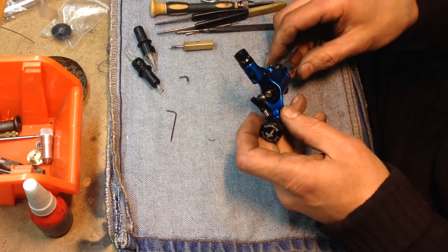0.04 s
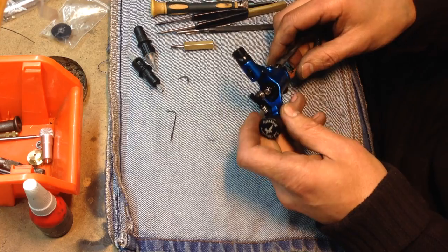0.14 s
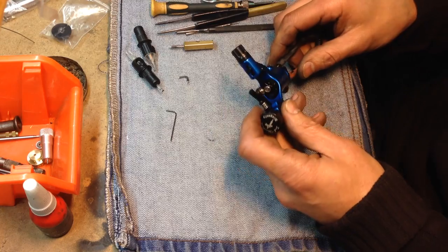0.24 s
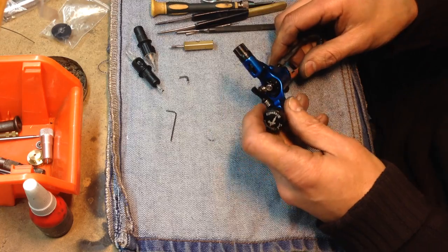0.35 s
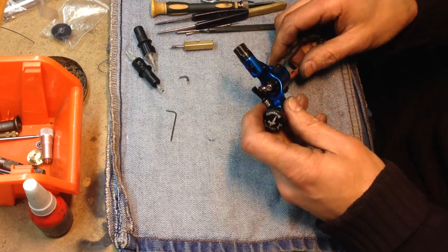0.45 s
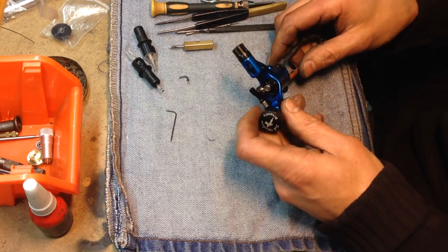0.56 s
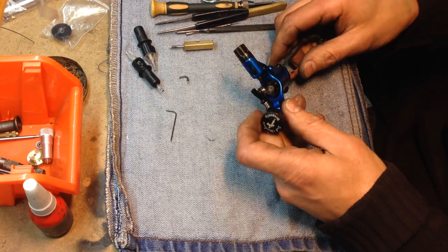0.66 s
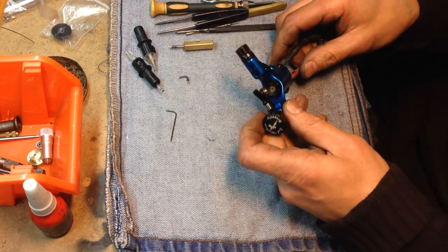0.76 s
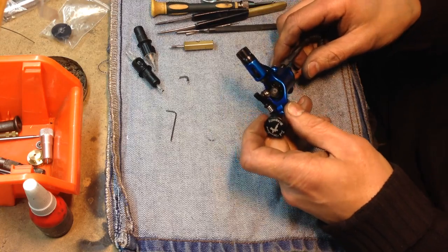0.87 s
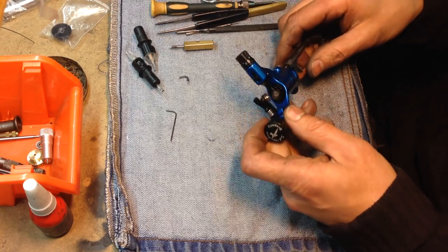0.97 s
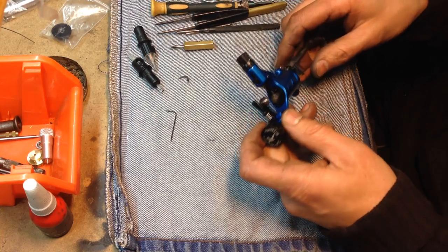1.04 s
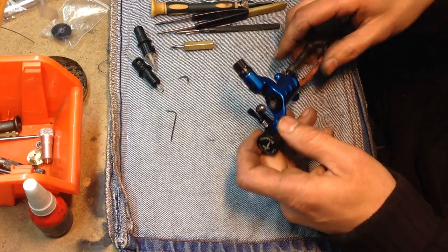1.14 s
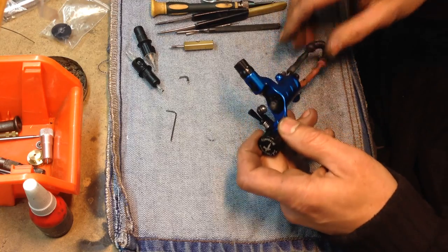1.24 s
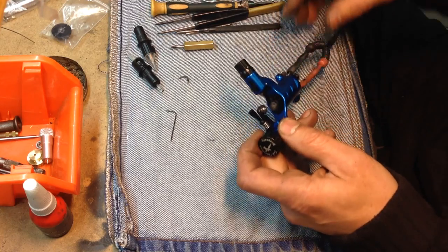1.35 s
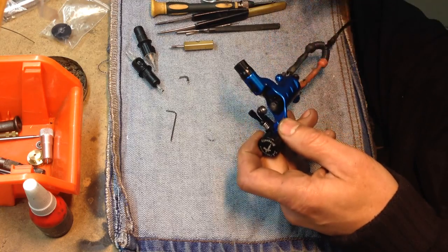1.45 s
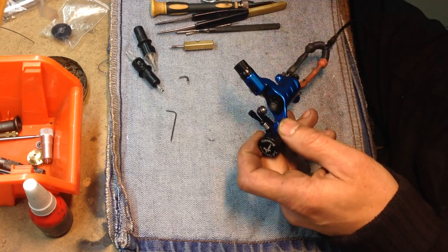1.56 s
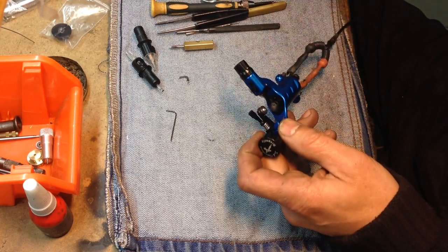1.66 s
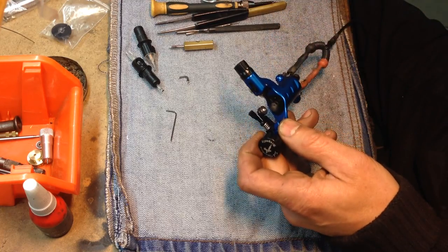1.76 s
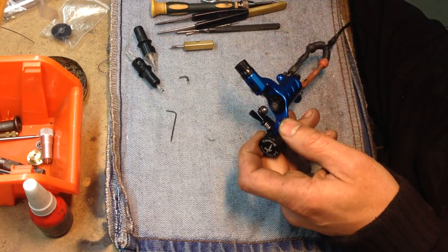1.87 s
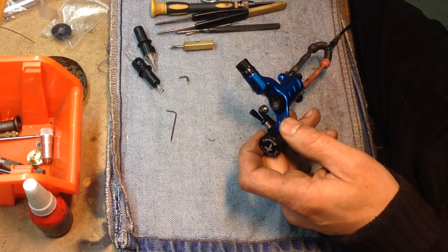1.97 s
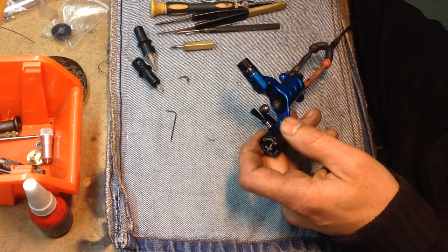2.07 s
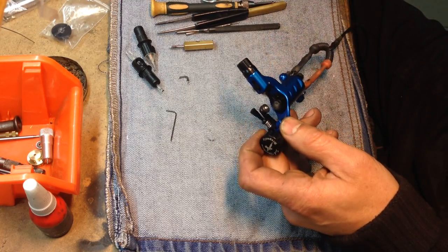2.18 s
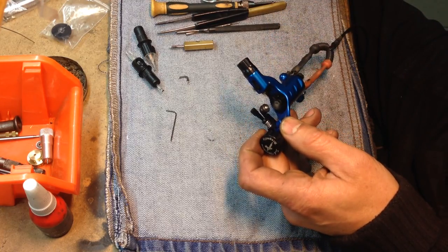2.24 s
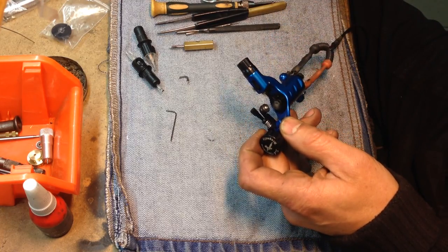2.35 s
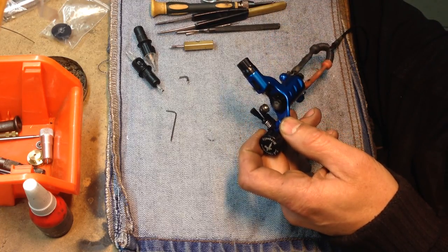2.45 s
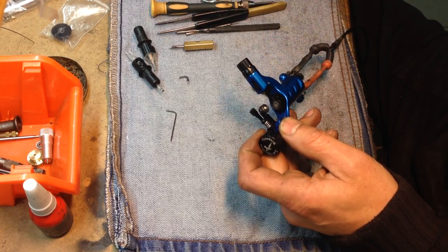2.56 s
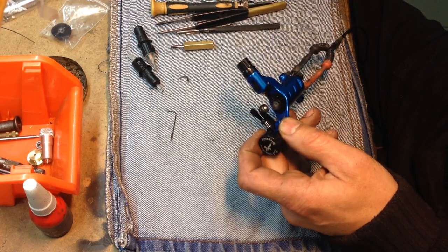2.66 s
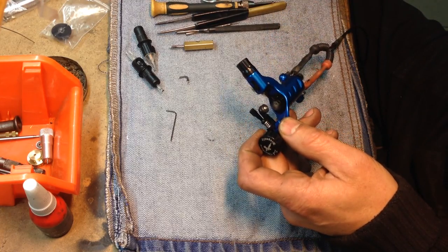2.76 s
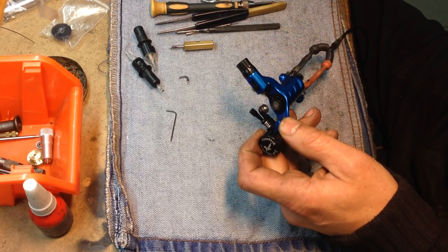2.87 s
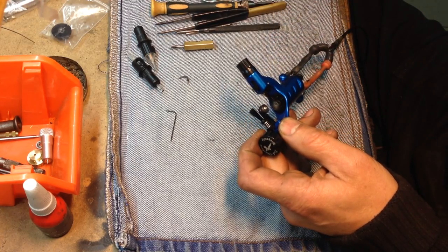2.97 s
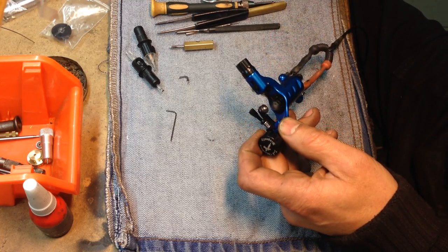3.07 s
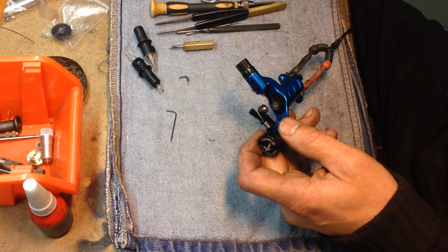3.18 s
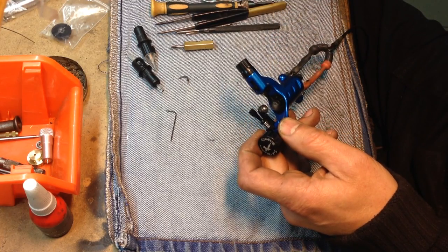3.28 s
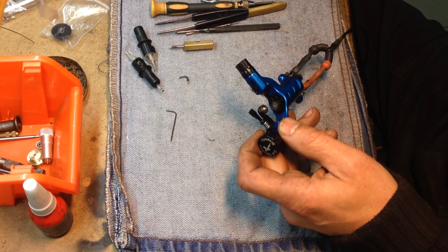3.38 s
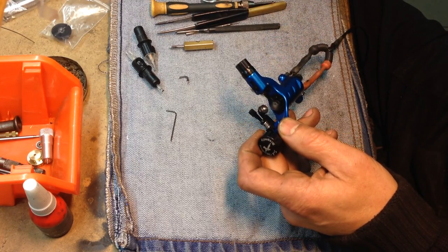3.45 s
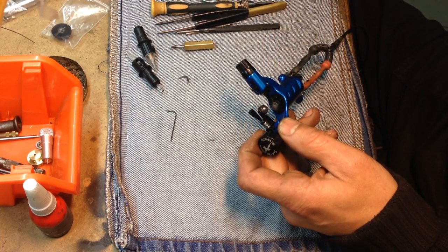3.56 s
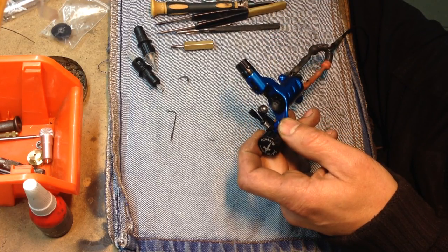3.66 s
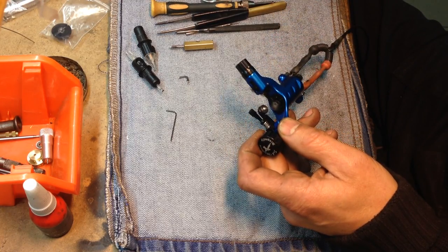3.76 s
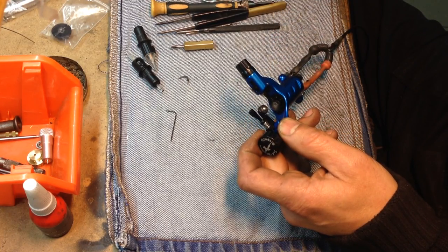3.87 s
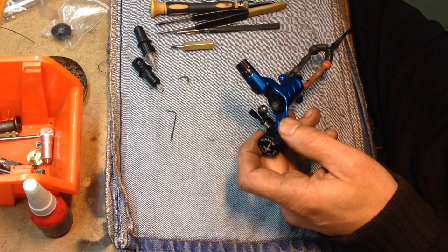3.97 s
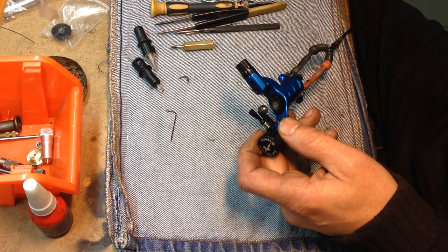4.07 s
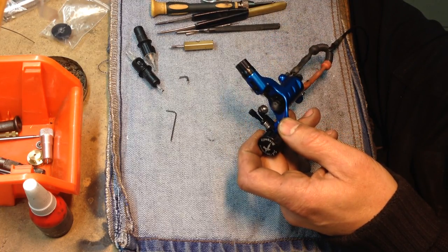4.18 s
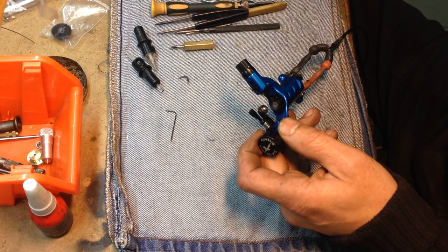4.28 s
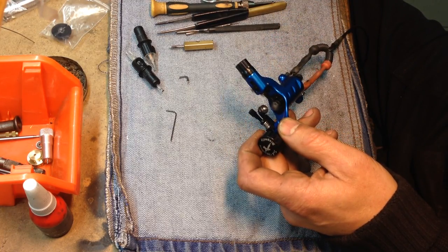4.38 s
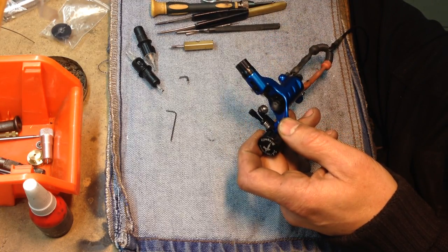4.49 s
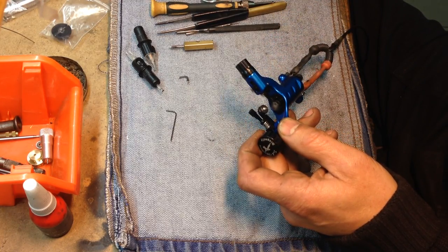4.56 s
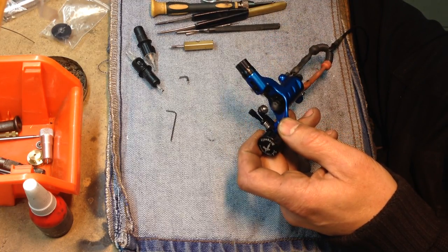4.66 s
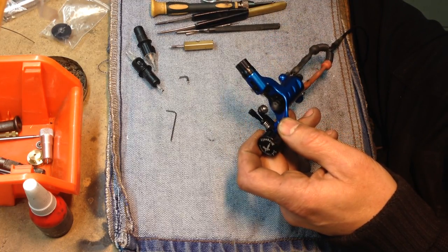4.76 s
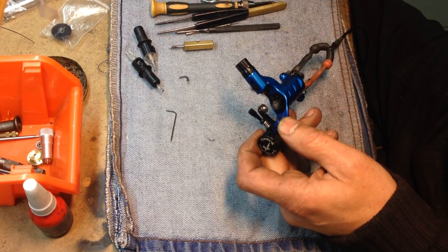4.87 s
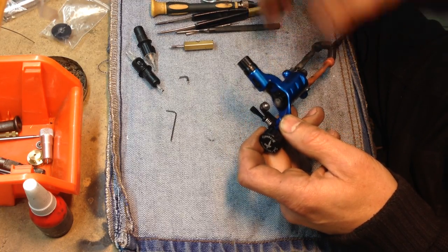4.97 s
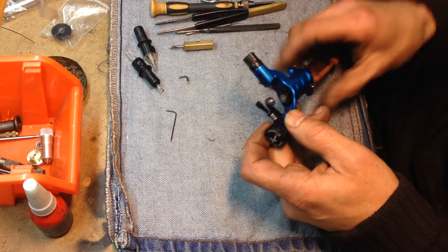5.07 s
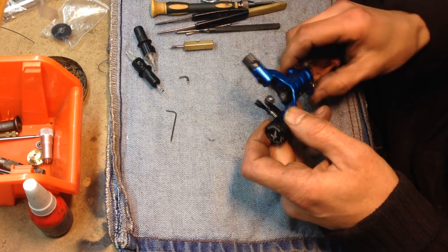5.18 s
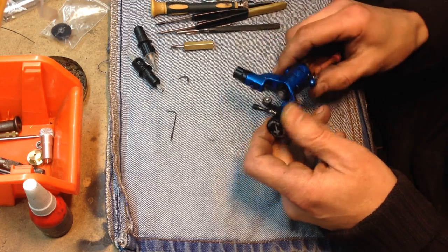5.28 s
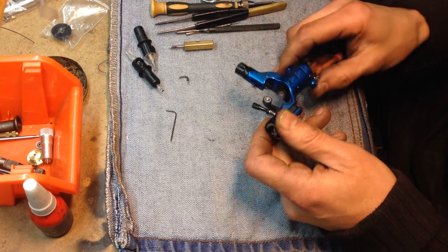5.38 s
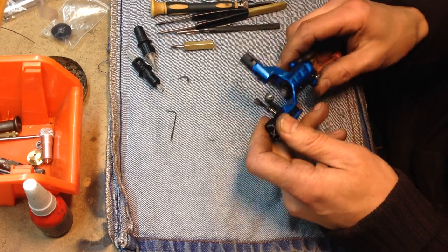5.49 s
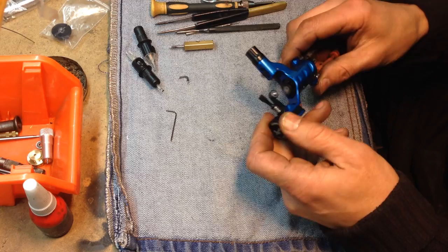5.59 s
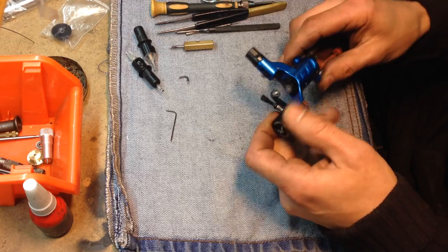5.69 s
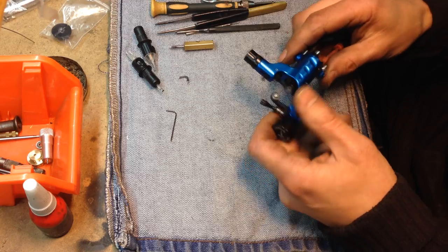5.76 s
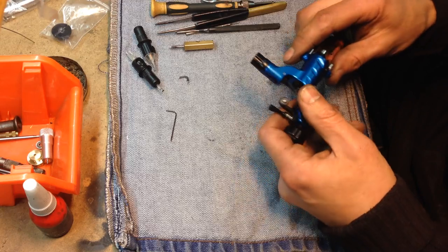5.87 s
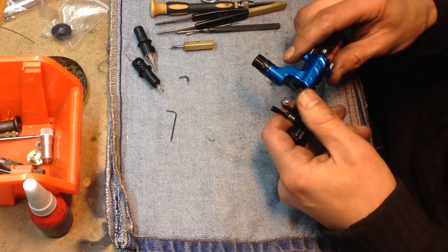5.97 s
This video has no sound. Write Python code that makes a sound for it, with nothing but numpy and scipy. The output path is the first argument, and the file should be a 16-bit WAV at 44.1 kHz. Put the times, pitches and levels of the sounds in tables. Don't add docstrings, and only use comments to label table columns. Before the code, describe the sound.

Close at a cloth-covered bench in a quiet, slightly hissy room, a spring cord is clamped onto a small motor: gritty scrapes, brief squeaks, bright metallic ticks and dull thuds. A faint thin whine follows. Its speed climbs into a harsh knocking buzz for about a second, then falls back to a steady whine with light handling bumps and cloth scuffs.

```python
import sys
import numpy as np
from scipy import signal
from scipy.fft import rfft, irfft
from scipy.io import wavfile

SR = 44100
rng = np.random.default_rng(int(sys.argv[2]) if len(sys.argv) > 2 else 0)


def unload_wav(signal):
    wavfile.write(
        sys.argv[1],
        SR,
        np.round(np.clip(np.atleast_2d(signal).T, -1, 1) * 32767).astype(np.int16),
    )


def volts(x):
    e = np.asarray(x, float) / 20
    return 10 ** e


N = 265828
CLAMP_SAMPLES = int(1.4 * SR)

# frequency in Hz, level in dB.
HISS_TONE = [(65, -10), (110, -3.5), (150, -11), (205, -13.5), (279, -23), (945, -35), (2250, -23.5),
             (3070, -20.5), (3620, -21), (5370, -23), (6880, -22.5), (14500, -26.5), (15400, -22.5)]
# frequency in Hz, rms level in dB.
MAINS_HUM = [
    (100, -67.5),
    (200, -73.5),
]
# middle in seconds, peak in dB, half length in seconds.
HAND_SHIFTS = [
    (2.47, -65, 0.052),
    (5.22, -55, 0.023),
]
# middle in seconds, peak in dB, half length in seconds.
HAND_SQUEEZES = [(.9, -50.5, 0.025), (2.8, -51, 0.025), (3.56, -51, 0.036), (3.72, -57, 0.039),
                 (3.78, -45, 0.024), (3.86, -47, 0.039), (3.91, -45.5, 0.01), (4.185, -44.5, 0.037),
                 (4.52, -62.5, 0.087), (5.33, -54.5, 0.012), (5.515, -53.5, 0.015), (5.72, -51, 0.013),
                 (6.0, -66, 0.029)]
# middle in seconds, peak in dB, half length in seconds, lowest Hz, highest Hz.
CLOTH_SCUFFS = [(0.01, -60, 0.034, 200, 790), (0.086, -61, 0.014, 800, 4200),
                (0.151, -56, 0.0023, 496, 3200), (0.22, -70, .022, 900, 3000),
                (0.36, -59, .008, 1500, 4550), (0.912, -64, 0.013, 890, 2630),
                (0.938, -71, 0.092, 294, 576), (2.483, -68, 0.023, 1800, 2770),
                (4.635, -72, 0.041, 342, 634), (4.89, -69, 0.02, 350, 920), (4.892, -75, 0.01, 1190, 2100),
                (5.03, -83, 0.022, 400, 900), (5.16, -74, 0.014, 960, 1750), (5.184, -62, 0.023, 220, 1220),
                (5.275, -86, .03, 330, 645), (5.483, -79, 0.046, 347, 686), (5.526, -69, .01, 2800, 4500)]
# start in seconds, peak in dB, pitch in Hz, ring T60 in seconds.
SOFT_BUMPS = [(.068, -41, 123.6, 0.14), (0.115, -44, 121, 0.38), (.505, -37, 113, 0.23),
              (.05, -45.5, 123, 0.19), (.47, -45.5, 193, 0.22), (.59, -45.5, 178, 0.23),
              (.63, -42, 114, .25), (.675, -40, 235, 0.15), (.7, -46, 200, 0.14), (.74, -49, 246, 0.27),
              (0.788, -40.5, 76.5, 0.18), (3.81, -59, 1526, 0.14), (4.12, -64, 1515, 0.19),
              (4.963, -51.5, 377, 0.048), (.886, -45.5, 1330, 0.043), (1.119, -58.5, 579, 0.22),
              (2.331, -55, 450, 0.13), (2.451, -46.5, 460, 0.18), (2.448, -43.5, 1104, 0.053),
              (2.451, -52, 1470, 0.053), (2.45, -48, 1900, 0.036), (2.469, -51, 245, 0.11),
              (3.27, -60.5, 510, 0.31), (4.619, -44.5, 1420, 0.02), (4.618, -48, 2240, 0.031),
              (4.616, -59, 1850, 0.026), (4.888, -56, 483, 0.066), (4.963, -44.5, 724, 0.021),
              (5.207, -41.5, 455, 0.1), (5.207, -46.5, 755, 0.076), (5.318, -64, 433, 0.074),
              (5.541, -62, 378, 0.068), (5.619, -55, 276, 0.047), (5.88, -59, 467, 0.13)]
# frequency in Hz, width in Hz, level in dB.
BENCH_MODES = [(73.6, 25, -3.5), (120.5, 15.4, 3.5), (173.6, 31, -4), (200, 43, -5.5), (290, 190, -15),
               (510, 220, -17.5)]
# start in seconds, hold in seconds, grit level in dB, fizz level in dB.
CLAMP_STROKES = [
    (0.068, 0.37, -64, -98),
    (0.19, 0.054, -77, -64),
    (0.354, 0.021, -72, -60),
    (0.413, 0.042, -53, -55.5),
    (0.47, 0.076, -38.5, -78),
    (0.558, 0.12, -39.5, -78),
    (0.653, 0.031, -43.5, -55),
    (0.693, 0.0034, -67, -54),
    (0.722, 0.01, -38, -64),
    (0.871, 0.041, -56, -70),
]
# frequency in Hz, width in Hz, level in dB.
CLAMP_MODES = [(655, 13, -5), (910, 15, 3.5), (1190, 156, 8.5), (1800, 110, 3.5), (2190, 62, 5),
               (2424, 22, 5), (2800, 18, 7.5), (3080, 25, -26), (3300, 21, -30), (3850, 61, 2.5),
               (4260, 23, -7), (5330, 18, -30)]
# start in seconds, level in dB.
SPRING_SNAPS = [
    (0.698, -39.5),
    (.7075, -45),
    (0.7533, -48.5),
    (0.799, -55),
]
# start in seconds, length in seconds, slips per second, strongest Hz, level in dB.
SLIP_SQUEAKS = [(0.071, 0.02, 2440, 2530, -60.5), (0.112, 0.02, 2490, 2500, -63.5),
                (0.343, 0.018, 1640, 1540, -66.5), (.432, 0.014, 2360, 2450, -51.5),
                (0.474, 0.051, 1030, 4120, -56), (0.424, .02, 2700, 2750, -56),
                (0.464, 0.0086, 940, 1830, -45), (0.504, 0.014, 920, 1810, -41.5),
                (0.517, 0.036, 930, 2810, -53.5), (.55, 0.023, 1130, 1130, -46.5),
                (0.594, 0.038, 985, 3950, -53.5), (0.605, 0.032, 885, 880, -40),
                (0.627, 0.026, 1035, 3050, -47), (0.65, 0.05, 1040, 3450, -45.5),
                (0.665, 0.014, 1068, 1580, -36), (0.681, 0.014, 1040, 3300, -43),
                (0.7228, 0.023, 1074, 2200, -35), (0.734, 0.023, 1700, 3450, -55),
                (0.743, 0.052, 1078, 3200, -52), (0.725, 0.033, 1068, 4200, -48.5),
                (0.748, 0.018, 1300, 1085, -52.5), (0.802, 0.021, 1075, 2170, -50),
                (0.867, 0.049, 1030, 2700, -71), (0.891, 0.015, 1040, 4230, -62)]
# start in seconds, peak in dB, highest Hz.
CLAMP_TICKS = [(0.2878, -27.5, 6960), (0.2884, -50, 14700), (0.35, -29.5, 8400), (0.415, -23, 5200),
               (0.416, -28, 6450), (0.4649, -9.5, 5400), (0.466, -27.5, 9000), (0.5965, -25, 6000),
               (.6438, -23, 6500), (.6702, -31, 6500), (0.6963, -10, 7300), (0.7096, -20, 7950),
               (0.7256, -34, 5500), (0.7744, -24, 6500)]
# time in seconds, speed in turns per second.
SHAFT_SPEED = [(0.93, 76.8), (1.194, 76.7), (1.25, 76.3), (1.916, 77.0), (1.982, 76.2), (2.45, 76.95),
               (2.49, 79.9), (2.7, 86.8), (2.81, 99.0), (2.97, 101.6), (3.08, 99.7), (3.36, 101.7),
               (3.53, 100.3), (3.62, 102.7), (3.73, 92.3), (3.775, 90.8), (3.83, 92.4), (3.88, 89.6),
               (3.99, 86.8), (4.13, 90.4), (4.27, 87.2), (4.45, 86.9), (5.24, 86.95), (5.296, 87.45),
               (5.414, 87.5), (5.516, 86.8), (5.722, 87.05), (5.83, 87.7), (6.03, 87.5)]
# time in seconds, level in dB.
HAND_SHAKE = [(0.95, -81), (1.05, -63), (1.7, -55), (2.15, -56.5), (2.5, -52.5), (2.7, -61), (2.9, -51.5),
              (3.44, -53), (3.5, -59.5), (4.05, -61.5), (4.35, -66), (4.92, -60), (5.05, -76), (6.03, -72)]
# time in seconds, level in dB, unevenness from 0 to 1.
CAM_KNOCK = [(2.775, -68, 0.2), (2.8, -53.5, 0.2), (2.83, -53.5, 0.36), (2.848, -57, 0.4),
             (2.865, -52.5, 0.3), (2.95, -52, 0.27), (3.1, -52.5, 0), (3.3, -51.5, 0.21), (3.4, -51, 0.35),
             (3.468, -51.5, 0.55), (3.49, -56, 0.14), (3.498, -66, 0), (3.507, -55, 0.1),
             (3.522, -51.5, 0.56), (3.614, -50, 0.42), (3.67, -54.5, 0), (3.684, -83, 0.3), (3.7, -83, 0.1)]
# frequency in Hz, width in Hz, lift in dB.
FRAME_STAGES = [(1654, 224, 18), (1850, 96, 9), (2240, 27, 11.5), (2500, 53, 14.5), (2630, 80, -5),
                (2700, 30, 12.5), (3060, 215, 20.5), (3260, 79, -22), (3750, 83, 13.5), (4230, 150, 4),
                (4620, 410, 9), (5180, 150, 7), (5600, 70, 12), (6060, 630, 8), (8400, 1600, -22),
                (9700, 1500, 11.5), (11200, 880, 11.5)]
# time in seconds, level in dB, turn of the housing from near face -1 to far face 1,
# level in dB of the ring left free by the thumb.
COMMUTATOR_WHINE = [(.9, -80, -2, 11), (1.05, -71.5, 0.081, 3), (1.4, -72, -0.58, 6),
                    (2.4, -68.5, 1.3, 0.5), (2.6, -66.5, 0.87, 0.5), (2.76, -66, 1.3, -2),
                    (2.82, -62.5, 0.58, -2), (3.62, -61, 0.81, -26), (3.7, -64, 1.4, 0),
                    (3.9, -67, 1.37, 0.5), (4.85, -67, 1.1, -0.3), (5.25, -67, 0.94, -2.5),
                    (5.42, -70.5, 1.6, -1), (5.55, -68, 0.9, -10.5), (5.7, -66.5, 0.79, -6.5),
                    (5.85, -67.5, 1.2, -8.5), (5.93, -67, -0.018, -5), (6.03, -67, -0.085, -4.5)]
STRONG_ORDER_NUMBERS = [9, 26, 29, 31, 34, 35, 36, 37, 40, 42, 44, 54, 56, 62, 64, 66, 68, 69, 71, 72, 77,
                        78, 82, 84, 86, 89, 94, 104, 109, 115, 116, 117, 138, 142, 146, 25, 47, 55, 61, 63,
                        65, 73, 80, 87, 90, 93, 95, 99, 102, 108, 111, 113, 122, 127, 136]
STRONG_ORDER_LIFTS = [17.5, 4.5, 9.5, -1, 14.5, 8, 14, 4, 13.5, 5, 16, 1, 1, -3, 2, 11, 0, 15, 11.5, 6.5, 7,
                      -13, 7, 1, 3, 3.5, 6, 3, -4, -7, 9, 5.5, 6, 15, -6, 10, 10, 1, 4, 1.5, 7.5, 1, -4, 9,
                      5.5, 3.5, 4, 1, 8, -3, 2, 4, 18, 3, 3]
# frequency in Hz, width in Hz, level in dB.
HOUSING_MODES = [(820, 65, -21.5), (1500, 71, -5.5), (1954, 20, 0), (2265, 18, -2), (2557, 120, -6),
                 (2810, 77, -4.5), (3848, 290, -11), (4690, 450, -6)]
# frequency in Hz, width in Hz, level in dB.
THUMB_MODES = [(3107, 92, -0.7)]
# frequency in Hz, width in Hz, level in dB.
NEAR_FACE_MODES = [(4990, 120, 7), (5423, 100, 5.5), (6570, 150, 8.5), (7270, 200, -10), (8950, 200, 1.5),
                   (10900, 360, 3), (13300, 600, 0)]
# frequency in Hz, width in Hz, level in dB.
FAR_FACE_MODES = [(5680, 540, -5.5), (5960, 140, -9.5), (6310, 410, -1), (7780, 200, -7.5),
                  (9400, 170, -25), (9430, 110, -14), (10240, 300, -16.5), (13200, 1100, -17),
                  (13900, 900, -10)]


def seconds():
    return np.arange(N) / SR


def curve(rows, off=-120):
    s, *columns = np.transpose(rows)
    return [np.interp(seconds(), s, c, off, c[-1] if s[-1] > 6 else off) for c in columns]


def unit(x):
    return x / np.sqrt(np.mean(x ** 2) + 1e-20)


def noise():
    return rng.standard_normal(N)


def band(x, low_hz, high_hz, order=2):
    edges = [low_hz, min(high_hz, .45 * SR)]
    return signal.sosfilt(signal.butter(order, edges, "band", fs=SR, output="sos"), x)


def resonate(x, modes, widen=1, count=1):
    out = 0
    for k, (hz, width, db) in enumerate(modes):
        r = np.exp(-np.pi * width * widen / SR)
        poles = [1, -2 * r * np.cos(2 * np.pi * hz / SR), r * r]
        ring = x + 1e-18
        for _ in range(count):
            ring = signal.lfilter([(1 - r * r) / 2, 0, (r * r - 1) / 2], poles, ring)
        out = out + (-1) ** k * volts(db) * ring
    return out


def drift(hz):
    return unit(band(noise(), hz / 8, hz, order=1))


def grains(per_s, spread_db):
    hits = rng.random(N) < per_s / SR
    size = volts(spread_db * np.minimum(rng.exponential(1, N), 4))
    return hits * size * rng.choice([-1, 1], N)


def lumps(rows):
    t = seconds()
    return sum(volts(db) * np.exp(-np.minimum(((t - s) / half) ** 2, 20)) for s, db, half in rows)


def stroke(s, hold, db, fall_db_per_s, attack=0.0017):
    t = np.arange(CLAMP_SAMPLES) / SR - s
    fall_db = fall_db_per_s * np.clip(t - hold, 0, .5)
    return np.pad(np.clip(t / attack, 0, 1) * volts(db - fall_db), (0, N - len(t)))


def room_hiss():
    hz = np.fft.rfftfreq(N, 1 / SR)[1:]
    points = np.array(HISS_TONE)
    shape = volts(np.interp(np.log(hz), np.log(points[:, 0]), points[:, 1]))
    return volts(-62) * unit(irfft(rfft(noise()) * np.r_[0, shape], N))


def mains_hum():
    return sum(volts(db + 2.0 + 2.6 * drift(9.4)) * np.cos(2 * np.pi * hz * seconds()) for hz, db in MAINS_HUM)


def handling():
    shaken = volts(-89) + volts(-19) * lumps(HAND_SQUEEZES) + volts(-11 + curve(CAM_KNOCK)[0])
    rubbed = volts(-67) * np.clip(seconds() / 0.63, 0, 1) + lumps(HAND_SHIFTS)
    deep = shaken * volts(2.0 * drift(23.0)) * unit(band(noise(), 30, 108, order=3))
    rustle = rubbed * volts(-6 + 2.0 * drift(38)) * unit(band(noise(), 82, 407, order=1))
    return deep + rustle


def scuffs():
    rough = noise() * volts(4.5 * drift(57))
    out = 0
    for s, db, half, low_hz, high_hz in CLOTH_SCUFFS:
        out = out + lumps([(s, db, half)]) * unit(band(rough, low_hz, high_hz))
    return out


def bumps():
    size, padded_below_hz = 8000, 240
    out, t = np.zeros(N + size), np.arange(size) / SR
    for s, db, hz, t60 in SOFT_BUMPS:
        body_noise, crack_noise = rng.standard_normal((2, size))
        body = np.sin(2 * np.pi * hz * t) + .4 * unit(band(body_noise, hz * .75, hz * 1.3, order=1))
        body *= volts(-60 * t / t60) * np.minimum(t / .0015, 1)
        crack_db = -40 if hz < padded_below_hz else -11.5
        crack = unit(band(crack_noise, 190, np.clip(1.5 * hz, 900, 2600)))
        crack *= volts(crack_db - 60 * t / (0.22 * t60))
        out[int(s * SR):][:size] += volts(db - 5.0) * (body + crack)
    return out[:N]


def bench_thud(press):
    settling = volts(-52 - 100 * seconds())
    thud = volts(-50) * (press / press.max()) ** 0.49 + settling
    return thud * unit(resonate(noise(), BENCH_MODES) * volts(0.34 * drift(21)))


def clamp_scrape(press):
    grit = (grains(3500, 2.9) * volts(1.6 * drift(110)))[:CLAMP_SAMPLES]
    rings = 0
    for mode in CLAMP_MODES:
        rings = rings + resonate(grit * volts(7.4 * drift(17.8)[:CLAMP_SAMPLES]), [mode], widen=2.6)
    scrape = unit(band(rings + volts(-12) * grit, 696, 3800))
    return volts(-8.0) * press * np.pad(scrape, (0, N - CLAMP_SAMPLES))


def fizz_and_snaps():
    fizz = sum(stroke(s, hold, db, 300) for s, hold, _, db in CLAMP_STROKES)
    snap = sum(stroke(s, 0.0029, db, 1500, attack=0.0012) for s, db in SPRING_SNAPS)
    dust = grains(6200, 0.49)
    return volts(-3.5) * fizz * unit(band(dust, 3200, 5900, order=1)) + snap * unit(band(dust, 10000, 20500))


def squeaks():
    out = np.zeros(N)
    for s, length, hz, top_hz, db in SLIP_SQUEAKS:
        spread_octaves = 0.24 + 0.25 * max(db + 37.5, 0)
        t = np.arange(int(length * SR)) / SR
        wander = np.cumsum(rng.normal(0, .03, 4000))[:len(t)]
        phase = 2 * np.pi * hz * t + wander
        tone = 0
        for k in range(1, 6):
            octaves_away = np.log2(k * hz / top_hz)
            tone = tone + volts(-6 * (octaves_away / spread_octaves) ** 2) * np.sin(k * phase)
        swell = np.minimum(t / 0.0024, 1) * (1 - t / length) ** 0.21
        out[int(s * SR):][:len(t)] += volts(db) * unit(tone) * swell
    return out


def ticks():
    out, size = np.zeros(N), 900
    fade = np.exp(-np.arange(size) / (0.0046 * SR))
    for s, db, top_hz in CLAMP_TICKS:
        crack = band(rng.standard_normal(size), min(3700, top_hz / 1.3), top_hz) * fade
        out[int(s * SR):][:size] += volts(db - 20) * crack
    return out


def clamp():
    press = sum(stroke(s, hold, db, 256) for s, hold, db, _ in CLAMP_STROKES)
    return clamp_scrape(press) + fizz_and_snaps() + bench_thud(press) + squeaks() + ticks()


def shaft_turns():
    s, speed = np.transpose(SHAFT_SPEED)
    return np.cumsum(np.interp(seconds(), s, speed)) / SR


def shake(turn):
    since = seconds() - 4.285
    pulsing = 1 + .6 * (since > 0) * np.cos(2 * np.pi * 12.9 * since)
    passed_on = volts(curve(HAND_SHAKE)[0]) * pulsing + lumps(HAND_SQUEEZES)
    return volts(3.0) * passed_on * np.cos(2 * np.pi * (turn - 0.016))


def cam_blows(turn, uneven):
    count = np.arange(np.ceil(turn[-1]) - 1)
    at = np.interp(count + .085, turn, np.arange(N - 0.))
    chance = rng.standard_normal((len(at), 2)) * np.clip(uneven[at.astype(int)], 0, 1)[:, None]
    at = np.clip(at + 8 * chance[:, 0], 0, N - 2)
    blows, size = np.zeros(N), volts(3.2 * chance[:, 1])
    blows[at.astype(int)] = size * (1 - at % 1)
    blows[at.astype(int) + 1] = size * (at % 1)
    return blows


def loose_parts(blows):
    rattle = signal.lfilter([1], [1, -np.exp(-1 / (.004 * SR))], blows) * noise()
    chatter = rng.standard_normal((2, 400)) * np.exp(-np.arange(400) / (.002 * SR))
    grip = np.clip(.5 + .2 * drift(4), 0, 1)
    repeats = 0
    for share, kernel in zip((grip, 1 - grip), chatter):
        repeats = repeats + signal.fftconvolve(blows * share, kernel)[:N]
    return .03 * repeats + .02 * rattle


def knock(turn):
    level_db, uneven = curve(CAM_KNOCK)
    blows = cam_blows(turn, uneven)
    sound = band(loose_parts(blows) - blows, 1030, 7600)
    for hz, width, db in FRAME_STAGES:
        sound = sound + (volts(db) - 1) * resonate(sound, [(hz, width, 0)])
    longer_path_m = .327
    echo = np.roll(band(sound, 1900, 9000, order=1), int(longer_path_m / 343 * SR))
    sound = unit(band(sound + volts(-2.5) * echo, 1180, 22000))
    keep = np.exp(-1 / (0.035 * SR))
    singing = signal.lfilter([1 - keep], [1, -keep], volts(level_db - 21))
    return volts(level_db) * sound + singing * np.sin(2 * np.pi * 8 * turn)


def brush_contacts(turn):
    orders = volts(rng.normal(0, 2.5, 2049)) * (np.arange(2049) < 180)
    strong = orders.copy()
    strong[STRONG_ORDER_NUMBERS] = volts(np.array(STRONG_ORDER_LIFTS))
    lag = .65 * rng.random(2049)
    lag[33:38] = 0
    patterns = irfft(np.array([orders, strong - orders]) * np.exp(2j * np.pi * lag))
    size = patterns.shape[1]
    working_speed, speed_range = 87, 7
    settled = np.clip(1 - np.abs(np.gradient(turn) * SR - working_speed) / speed_range, 0.55, 1)
    turn = turn + .0013 * drift(3)
    turn = turn + .3
    even, uneven = (np.interp(turn % 1 * size, np.arange(size), p, period=size) for p in patterns)
    source = unit(even + settled * uneven) * volts(1.0 * drift(34))
    return (source + .2 * noise()) * (1 + .3 * np.cos(2 * np.pi * turn))


def whine(turn):
    source = brush_contacts(turn)
    level_db, facing, free_db = curve(COMMUTATOR_WHINE)
    housing = unit(resonate(source, HOUSING_MODES) + volts(free_db) * resonate(source, THUMB_MODES))
    near = unit(resonate(source, NEAR_FACE_MODES, count=2))
    far = unit(resonate(source, FAR_FACE_MODES, count=2))
    swing_db = 4.5 * np.clip(facing, -3, 3)
    faces = volts(-2 - swing_db) * near + volts(-4 + swing_db) * far
    hiss = volts(0.5) * unit(band(noise(), 5000, 16000, order=1))
    lines = volts(-7.5) * unit(band(source, 6700, 13500))
    return volts(level_db) * (hiss + lines + housing + faces)


def room(x):
    t = np.arange(int(.4 * SR)) / SR
    t60_s = 0.28
    tail = band(rng.standard_normal(len(t)), 87, 13100, order=1) * volts(-60 * t / t60_s) * (t > .004)
    return signal.fftconvolve(x, tail / np.sqrt(np.sum(tail ** 2)))[:N]


def scene():
    turn = shaft_turns()
    cam = knock(turn)
    hands = clamp() + bumps() + scuffs()
    wet = volts(-4.5) * room(hands + .4 * cam)
    motor = cam + whine(turn) + shake(turn)
    background = room_hiss() + mains_hum() + handling()
    return (motor + hands + wet + background)[None]


def roll_off(x):
    return signal.sosfilt(signal.butter(12, 15320, fs=SR, output="sos"), x)


def record(dry):
    mix = signal.sosfilt(signal.butter(2, 34, "high", fs=SR, output="sos"), dry)
    mix = signal.sosfilt(signal.cheby2(12, 50, 16000, fs=SR, output="sos"), mix)
    return roll_off(mix)


dry = scene()
out = record(dry)
unload_wav(out)
```